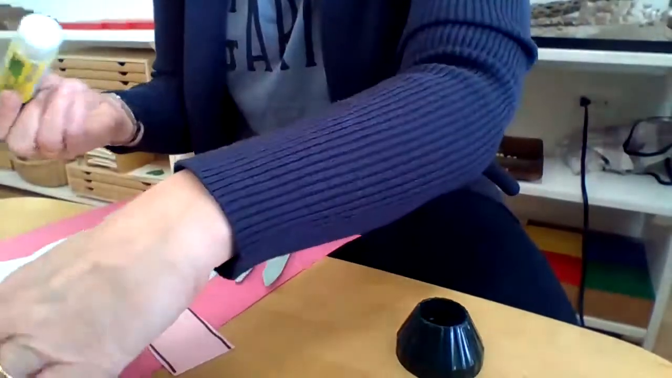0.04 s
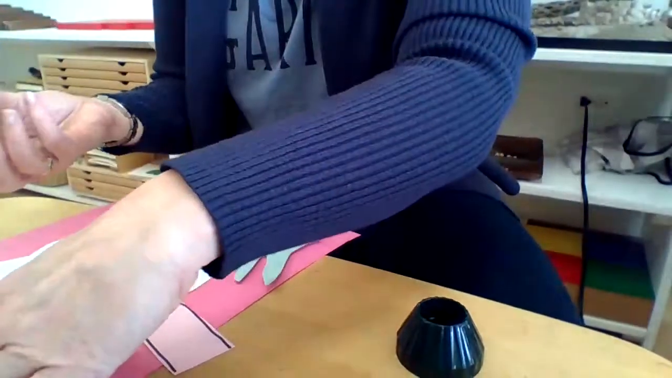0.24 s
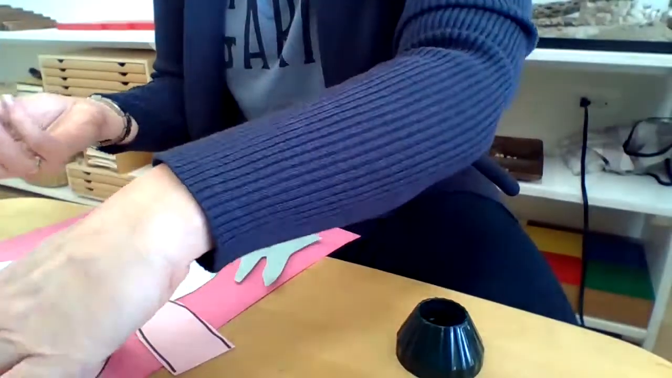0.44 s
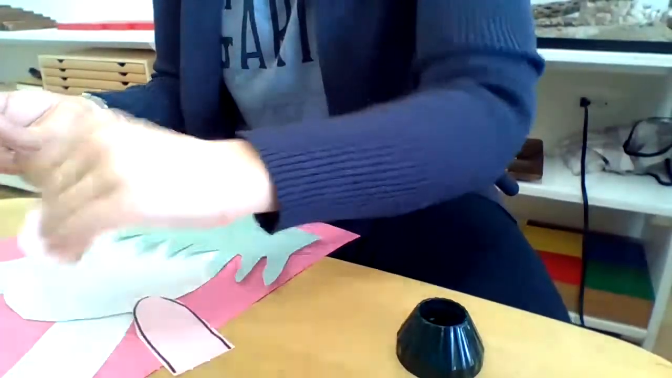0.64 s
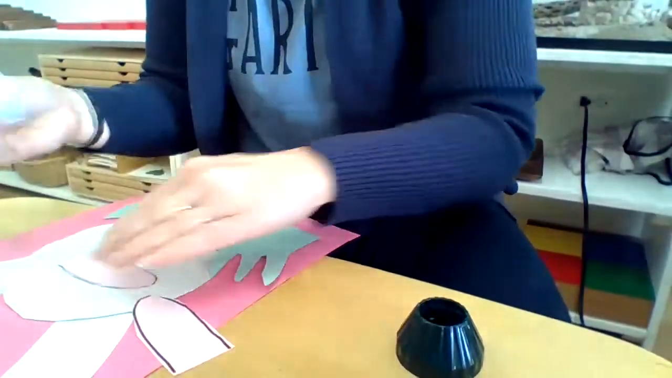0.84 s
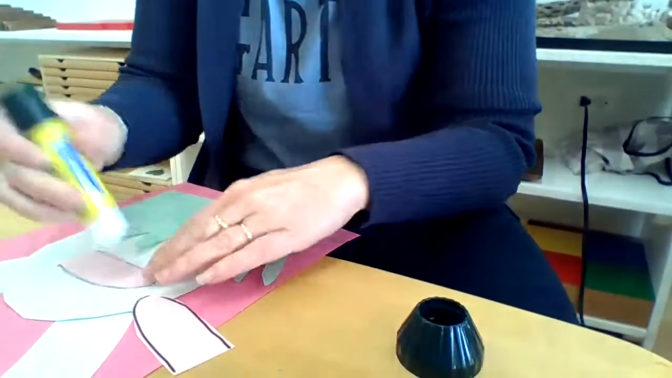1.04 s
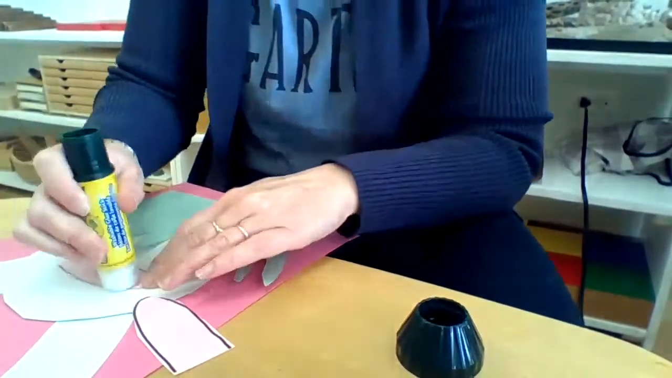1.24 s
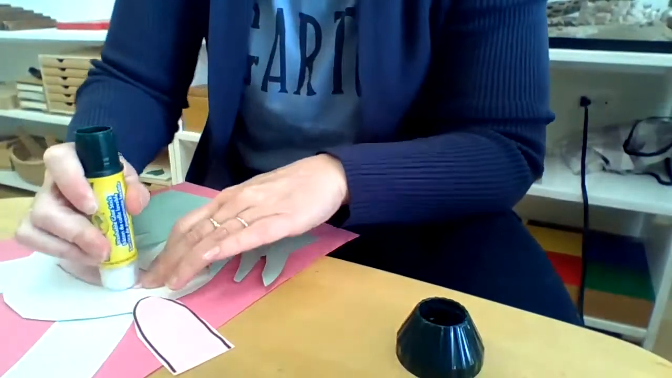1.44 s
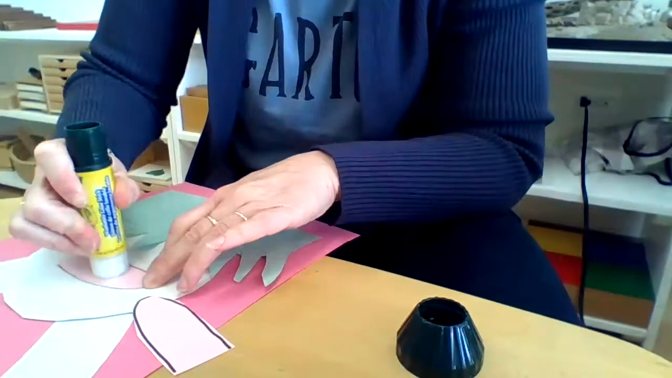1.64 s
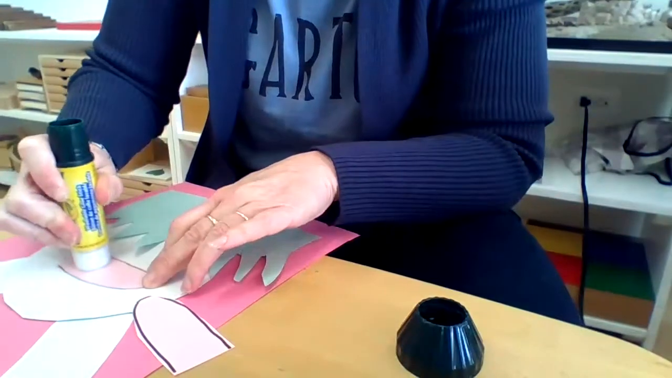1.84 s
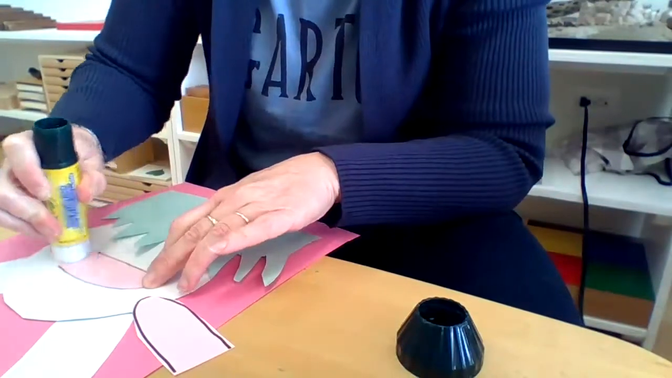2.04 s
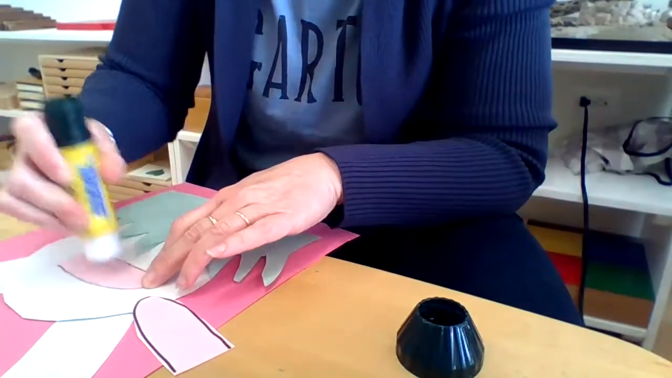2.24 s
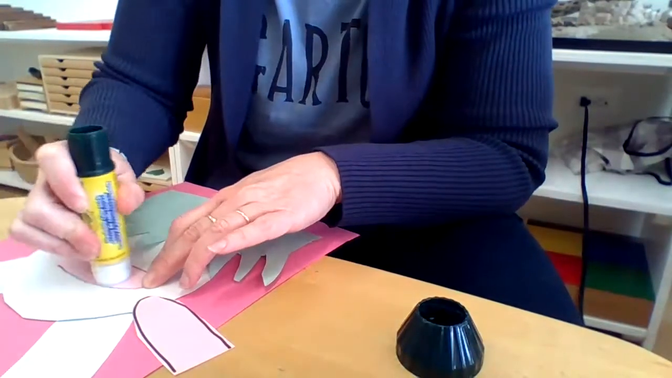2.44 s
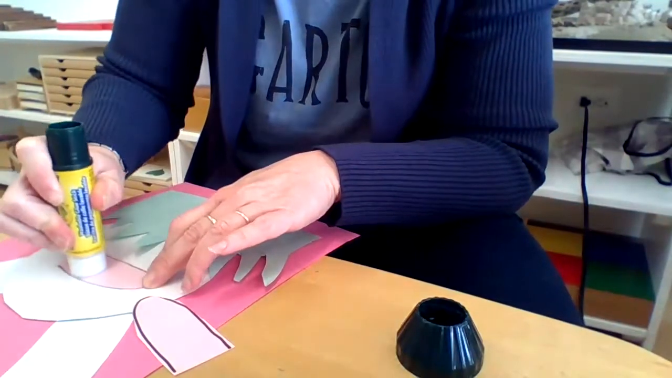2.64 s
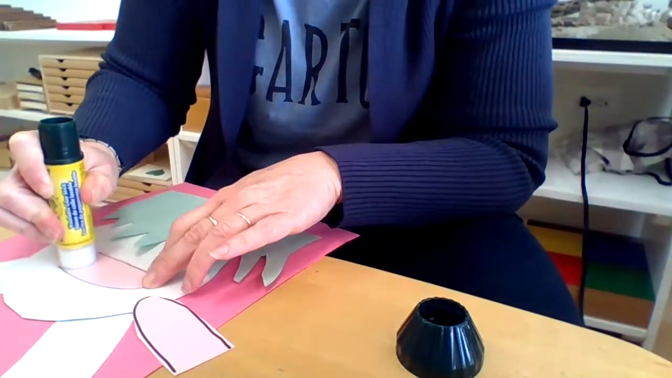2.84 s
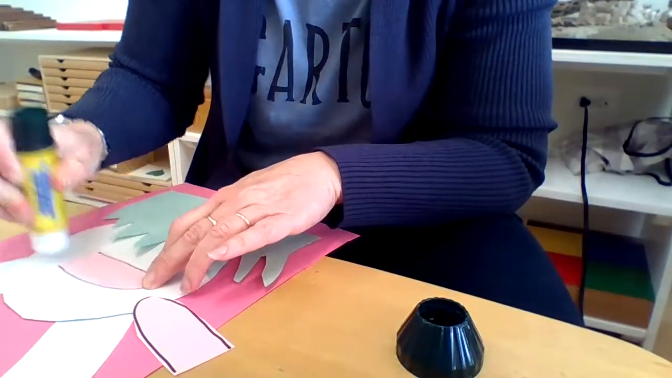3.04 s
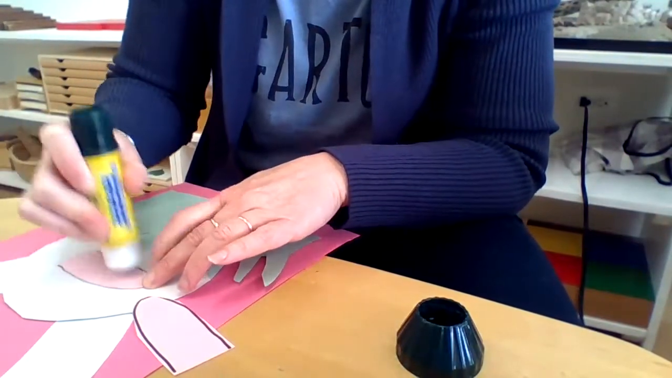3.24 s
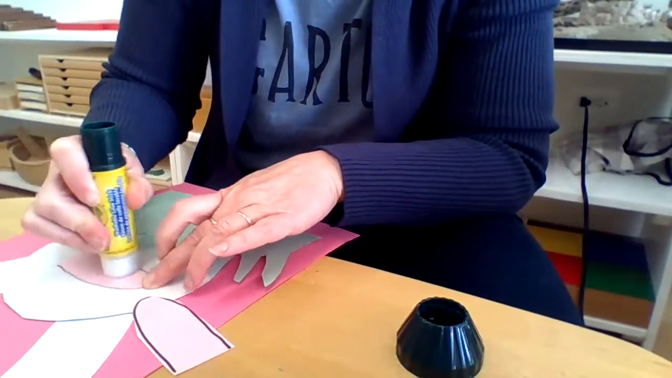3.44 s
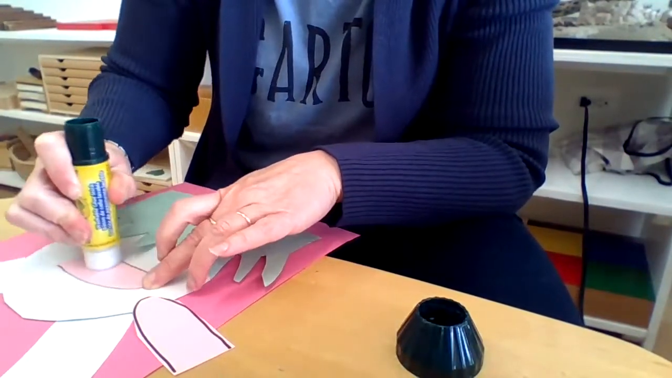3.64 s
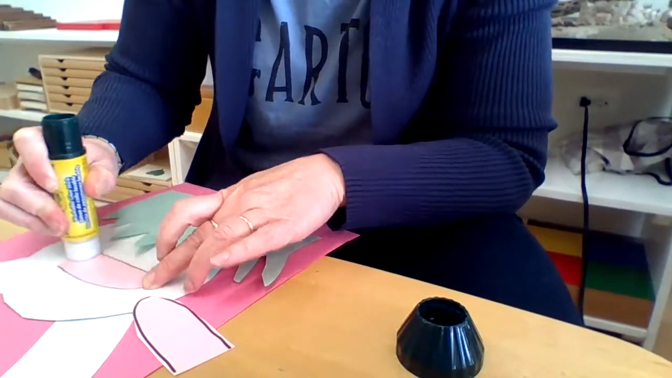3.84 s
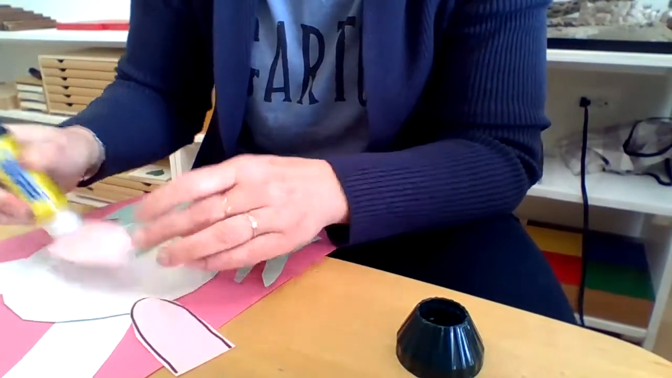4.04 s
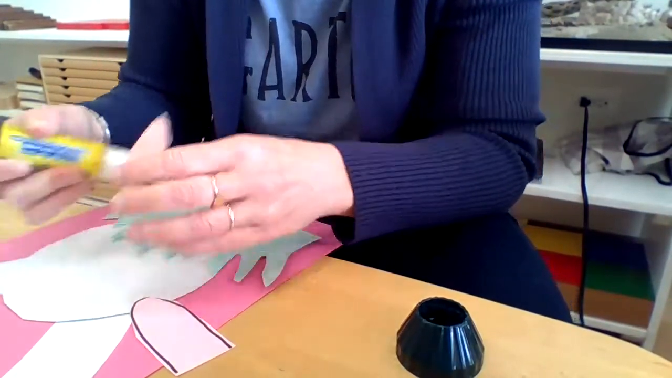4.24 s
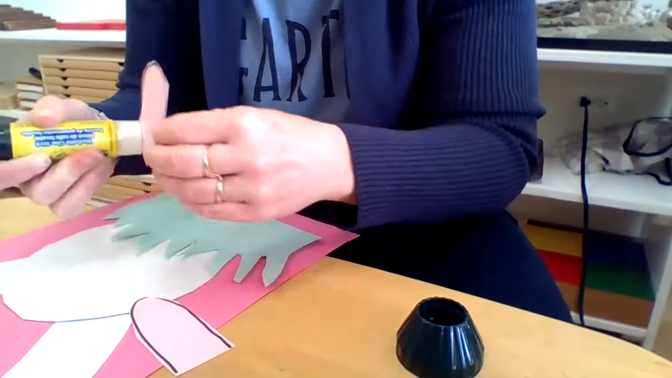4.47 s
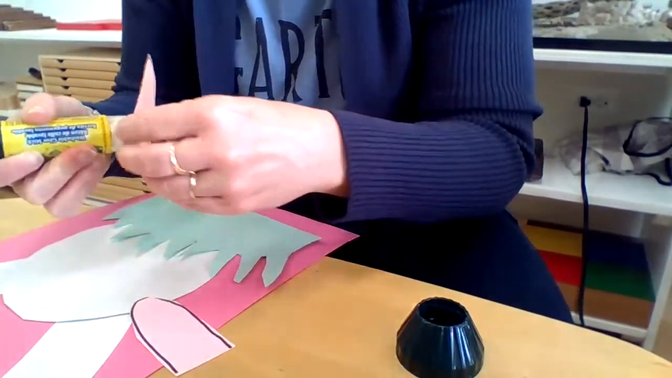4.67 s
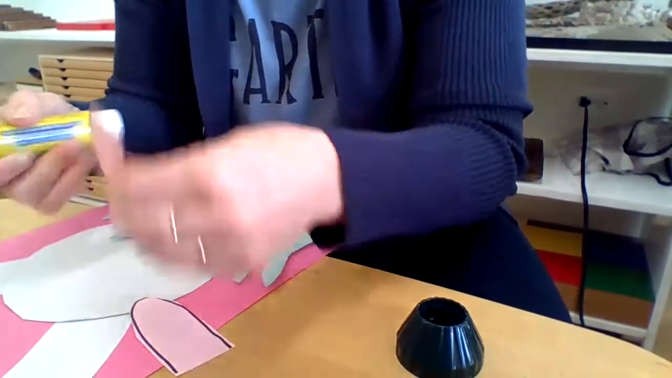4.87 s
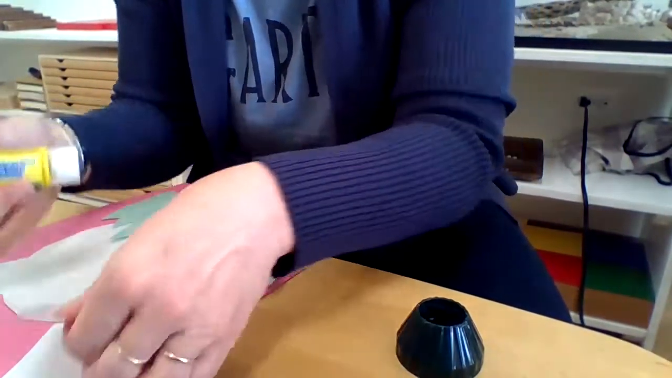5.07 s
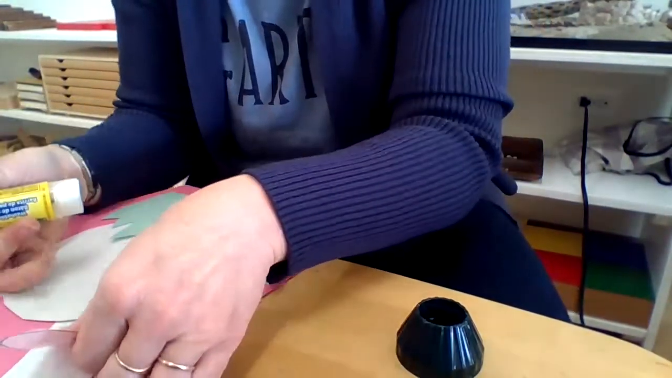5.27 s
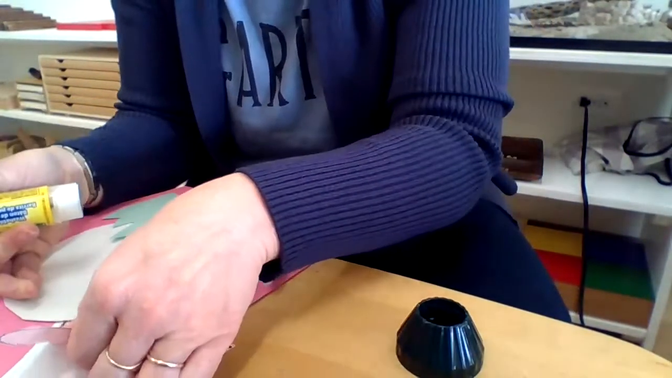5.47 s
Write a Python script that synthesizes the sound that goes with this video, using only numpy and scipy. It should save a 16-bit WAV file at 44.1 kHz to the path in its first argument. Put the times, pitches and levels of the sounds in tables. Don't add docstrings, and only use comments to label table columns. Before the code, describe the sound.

Three hard woody knocks of a glue stick on a paper-covered table, between faint papery rustles, a sticky snap and a last dull bump in a quiet room.

```python
import sys
import numpy as np
from scipy import signal
from scipy.fft import rfft, irfft, next_fast_len
from scipy.io import wavfile
from scipy.ndimage import uniform_filter1d

SR = 44100
rng = np.random.default_rng(int(sys.argv[2]) if len(sys.argv) > 2 else 0)


def volts_from_decibels(level):
    exponent = np.asarray(level, float) / 20
    return 10 ** exponent


def output_pcm(signal):
    pcm = np.clip(np.atleast_2d(signal).T, -1, 1) * 32767
    wavfile.write(sys.argv[1], SR, np.round(pcm).astype(np.int16))


N = 242991

# (first touch [s], rim crack [s], full force [s])
CONTACTS = [
    (1.3110, 1.3137, 1.3156),
    (2.4498, 2.4519, 2.45245),
    (3.4006, 3.4027, 3.4032),
]
# (touch [dB], crack [dB], blow [dB], contact [ms], room [dB])
KNOCKS = [
    (-20.5, -20, 0.5, 0.65, -44),
    (-25, -19, 0.8, 0.54, -43),
    (-23, -19, 0.4, 0.36, -40.5),
]


def evened(x):
    return x / np.sqrt(np.mean(x ** 2) + 1e-20)


def smooth_noise(width, passes=1):
    x = rng.standard_normal(N)
    for _ in range(passes):
        x = uniform_filter1d(x, size=width)
    return evened(x)


def read(points, hz):
    f, value = np.transpose(points)
    return np.interp(np.log(hz + 1), np.log(f + 1), value)


def add(mix, start_s, sound):
    part = mix[round(start_s * SR):][:len(sound)]
    part += sound[:len(part)]


def coloured(points, x):
    size = next_fast_len(len(x))
    gain = volts_from_decibels(read(points, np.fft.rfftfreq(size, 1 / SR)))
    return irfft(rfft(x, size) * gain, size)[:len(x)]


def click(points):
    log_gain = np.log(volts_from_decibels(read(points, abs(np.fft.fftfreq(2048, 1 / SR)))))
    pulse = np.fft.ifft(np.exp(np.conj(signal.hilbert(log_gain)))).real[:1024]
    return pulse / abs(pulse).max()


def ring(hz, t60_s, db=0, count=SR // 2):
    t = np.arange(count) / SR
    return volts_from_decibels(db - 60 * t / max(t60_s, .001)) * np.cos(2 * np.pi * hz * t)


def push(contact_ms):
    length = contact_ms * SR / 1000
    force = np.sin(np.pi * np.arange(.5, length) / length)
    return force / force.sum()


def table_top(place):
    # (frequency [Hz], t60 [s], sign, level at first, second, third place [dB])
    modes = [(146, .15, 1, -24.5, -22.5, -23), (209.9, .245, 1, -20, -18.5, -18.5),
             (262.3, .3, -1, -33, -33, -31.5), (289.8, .33, 1, -26.5, -25.5, -26.5),
             (324.8, .25, 1, -16.5, -17.5, -17), (373.5, .062, 1, -20.5, -18.5, -22),
             (420.5, .098, 1, -10.5, -10, -10.5), (449.2, .031, -1, -11, -8, -8),
             (511.9, .108, -1, -33, -30, -30.5), (565, .053, -1, -29.5, -18.5, -19),
             (642, .12, -1, -45, -24, -23.5), (690.5, .068, 1, -14.5, -7.5, -6.5),
             (715.2, .051, -1, -21, -24, -19.5), (860, .06, -1, -33, -32.5, -26.5),
             (940, .037, -1, -34, -27, -22.5)]
    return sum(sign * ring(hz, t60_s, db[place]) for hz, t60_s, sign, *db in modes)


def knocks():
    # (frequency [Hz], level [dB])
    crack_spectrum = [(500, -11.5), (1300, 2.5), (2350, -12), (2700, -24.5), (3200, -11.5), (4000, -24.5),
                      (5200, -10), (6800, -16.5), (9200, -20), (12500, -14), (14500, -13.5), (15800, -23.5),
                      (20000, -28)]
    # (frequency [Hz], t60 [s], level in first, second, third blow [dB])
    rim_modes = [(835, .035, -19, -39, -36), (1080, .06, -34.5, -39.5, -33), (1390, 0.023, -45, -29, -31.5),
                 (1290, 0.044, -37, -25.5, -29), (1530, 0.034, -27, -25.5, -26.5),
                 (1730, .02, -47.5, -32.5, -33.5), (1820, .03, -62, -35.5, -40),
                 (1950, .012, -55, -28, -33.5), (2150, 0.016, -36, -26, -21.5), (2390, .014, -49, -34, -38),
                 (2710, 0.014, -29.5, -56, -52.5), (2940, 0.019, -32.5, -42.5, -40),
                 (3270, .012, -49, -40.5, -44)]
    # (delay [s], level [dB])
    bounces = [(.004, -21), (.0068, -17), (.0095, -23), (.0128, -20), (.016, -23), (.0195, -26),
               (.023, -25), (.03, -30)]
    touch_tick_db, grind_db = -12, -15.5
    pulse = click(crack_spectrum)
    out = np.zeros(N)
    for place, (times_s, knock) in enumerate(zip(CONTACTS, KNOCKS)):
        touch_s, crack_s, force_s = times_s
        touch_db, crack_db, blow_db, contact_ms, _ = knock
        add(out, touch_s - .0003, -np.convolve(ring(770, .032, touch_db), push(.52)))
        blow = np.convolve(table_top(place), push(contact_ms))
        add(out, force_s - contact_ms / 2000, blow * volts_from_decibels(blow_db))

        rattle = ring(0, .012, -22, count=600) * rng.standard_normal(600)
        rattle[0] = -1
        crack = volts_from_decibels(crack_db) * np.convolve(rattle, pulse)
        add(out, crack_s, crack)
        add(out, touch_s, volts_from_decibels(touch_tick_db) * crack)

        squeeze = np.linspace(.15, 1, round((crack_s - touch_s) * SR)) ** 2
        squeeze = squeeze * rng.standard_normal(len(squeeze))
        grind = np.convolve(squeeze, np.convolve(pulse, push(.09)))
        add(out, touch_s, volts_from_decibels(crack_db + grind_db) * grind)

        treble = np.convolve(crack, [.4, .4, 0, -.4, -.4])
        for delay_s, bounce_db in bounces:
            smear = rng.standard_normal(30) / 6
            add(out, crack_s + delay_s, volts_from_decibels(bounce_db) * np.convolve(treble, smear))

        rim = sum(ring(hz, t60_s, db[place]) for hz, t60_s, *db in rim_modes)
        add(out, crack_s, -np.convolve(rim, push(.22)))
    return out


def bumps():
    # (time [s], blow [dB], contact [ms])
    hits = [
        (1.4445, -36, 0.72),
        (2.101, -47, .4),
        (2.133, -37.5, 0.25),
        (3.059, -40.5, 0.74),
        (3.777, -39.5, 0.2),
        (3.856, -40, 0.75),
        (4.058, -44, 1.9),
        (4.076, -29, 2.46),
        (5.288, -20, 2.52),
    ]
    out = np.zeros(N)
    for start_s, db, contact_ms in hits:
        add(out, start_s, np.convolve(table_top(2), push(contact_ms)) * volts_from_decibels(db))
    return out


def snaps():
    # (time [s], level [dB], level added at the top of the range [dB])
    releases = [
        (4.0553, -14.5, 0),
        (4.1022, -34, -7),
    ]
    # (frequency [Hz], level [dB])
    spectrum = [(180, -12), (300, 6.5), (987, -1.5), (2360, 6.5), (3410, 0), (4690, 9), (5550, 3),
                (7260, -10), (12800, 2), (16300, -2), (20000, -9)]
    out = np.zeros(N)
    for start_s, db, top_db in releases:
        shiver = ring(0, .011, -23, count=800) * rng.standard_normal(800)
        shiver[0] = 1
        snap = np.convolve(shiver, click(spectrum))
        add(out, start_s, volts_from_decibels(db) * coloured([(5000, 0), (12000, top_db)], snap))
    return out


def slips(per_s, spread_db, flutter_db):
    clumps = smooth_noise(300)
    size = volts_from_decibels(spread_db * np.minimum(rng.exponential(1, N), 4) + flutter_db * clumps)
    return evened(size * rng.standard_normal(N) * (rng.random(N) < per_s / SR))


def stroke(rows, column, rise_s, fade_db_per_s, rest_db, sag_db=0, arch=0):
    power = np.full(N, volts_from_decibels(rest_db) ** 2)
    t = np.arange(SR // 2) / SR
    for row in rows:
        start_s, hold_s = row[:2]
        done = np.clip(t / (rise_s + hold_s), 0, 1)
        swell = (.2 + .8 * np.sin(np.pi * done)) ** arch
        fade_db = fade_db_per_s * np.maximum(t - rise_s - hold_s, 0)
        gain = volts_from_decibels(row[column] + sag_db * done + fade_db)
        add(power, max(start_s - rise_s / 2, 0), (np.minimum(t / rise_s, 1) * swell * gain) ** 2)
    return np.sqrt(power)


def patchy(x, patchy_db):
    z = signal.stft(x, nperseg=256)[2]
    field = uniform_filter1d(rng.standard_normal(z.shape), size=7, axis=0)
    field = uniform_filter1d(field, size=7, axis=1)
    return evened(signal.istft(z * volts_from_decibels(patchy_db * evened(field)), nperseg=256)[1][:N])


def scraped_tube(down):
    # (frequency [Hz], width [Hz], level [dB])
    modes = [(1410, 320, 3), (1535, 320, -11), (2010, 340, 2), (2191, 270, -1.5)]
    # (stick lifted [dB], pressed on the sheet [dB])
    upper_db = (-3.5, -2)
    scrape = slips(per_s=9000, spread_db=1.5, flutter_db=1.3)
    rung = []
    for hz, width_hz, db in modes:
        mode = ring(hz, 2 / width_hz, count=600)
        twice = np.convolve(mode, mode)
        rung.append(volts_from_decibels(db) * evened(signal.oaconvolve(scrape, twice)[:N]))
    upper = volts_from_decibels(np.where(down, upper_db[1], upper_db[0]))
    return evened(sum(rung[:2]) + upper * sum(rung[2:]))


def rubbing():
    # (start [s], hold [s], flat of the hand [dB], tip of stick or finger [dB])
    presses = [(0.0, 0.04, -60.5, -62), (0.165, 0.013, -72, -47), (0.175, 0.028, -63, -43.5),
               (0.185, 0.078, -43, -52.5), (0.28, 0.1, -55, -57), (0.44, 0.036, -74, -62),
               (0.522, 0.0067, -47.5, -51.5), (0.55, 0.031, -51.5, -65), (0.605, 0.02, -73, -55),
               (0.825, 0.01, -70.5, -50), (1.44, 0.049, -44, -52), (1.565, 0.088, -54, -55.5),
               (1.738, 0.0074, -50, -45.5), (1.78, 0.1, -58, -51.5), (2.1, 0.015, -66.5, -62.5),
               (2.14, 0.037, -48.5, -61.5), (2.28, 0.1, -70, -75.5), (2.6, 0.074, -60, -61),
               (3.06, .04, -59, -67), (3.17, 0.056, -59.5, -84), (3.3, 0.089, -63, -75),
               (3.56, 0.14, -56, -77), (3.76, 0.1, -58.5, -72), (4.0, .1, -63, -59.5),
               (4.49, 0.13, -90, -69.5), (4.76, 0.035, -68, -59.5), (4.885, 0.015, -64.5, -53.5),
               (5.21, 0.11, -67.5, -63.5), (5.3, 0.048, -68, -76), (5.455, 0.013, -70, -69.5)]
    # (start [s], hold [s], tube scrape [dB], fibre hiss [dB])
    slides = [(0.0, 0.29, -69, -66), (0.16, 0.093, -52.5, -59.5), (.163, .025, -70, -59.5),
              (.22, 0.046, -70, -58.5), (.365, 0.016, -77, -64.5), (0.29, 0.21, -70.5, -66.5),
              (0.435, 0.036, -73, -56.5), (0.53, 0.071, -60, -62), (0.567, 0.021, -58, -45.5),
              (0.605, 0.043, -60.5, -50), (0.66, 0.045, -67, -66), (0.69, 0.14, -68.5, -65),
              (0.83, 0.0081, -66, -58), (.85, 0.033, -78, -62.5), (.882, 0.0072, -79, -61),
              (.9, .04, -84, -72), (1.0, 0.019, -70, -68), (1.44, 0.024, -69, -76),
              (1.54, 0.12, -68.5, -73), (1.74, 0.022, -64, -66), (1.76, 0.12, -53, -65),
              (1.86, 0.07, -58.5, -70), (2.128, 0.038, -65.5, -69), (3.27, 0.017, -84.5, -80),
              (4.06, 0.026, -70, -71), (4.104, 0.0067, -55, -63), (4.12, .06, -80, -77),
              (4.44, 0.11, -73.5, -72), (4.545, 0.051, -67, -62), (4.77, 0.017, -71, -69),
              (4.886, 0.0048, -62, -48), (5.21, 0.089, -66.5, -59.5), (5.235, .03, -75, -71),
              (5.29, 0.039, -65.5, -66), (5.325, 0.079, -65, -58), (5.39, 0.086, -75, -67.5)]
    # flat, tip, tube, fibres [dB]
    rest_db = [-87.5, -86, -82.5, -90]
    # (from [s], to [s])
    stick_down_s = (1.3, 4.11)
    # (frequency [Hz], level [dB])
    palm = [(60, -16.5), (130, 0), (210, -4.5), (300, -9.5), (450, -21.5)]
    # (frequency [Hz], level [dB])
    tip_contact = [(200, -22.5), (330, -3), (430, -0.5), (530, -5.5), (690, 1), (900, 9.5), (1050, 6.5),
                   (1200, -13.5)]
    # (frequency [Hz], level [dB])
    fingertip = [(250, 4), (450, 9), (700, 1), (1000, -1), (1300, -23), (1800, -30)]
    # (frequency [Hz], density [dB per Hz])
    fibres = [(1470, -26.5), (2500, -3.5), (3300, -4), (6250, -4.5), (7030, -4.5), (11100, -6), (15100, -9),
              (16100, -8.5), (16500, -30)]
    t = np.arange(N) / SR
    down = (t > stick_down_s[0]) & (t < stick_down_s[1])
    flat, tip = (stroke(presses, 2 + k, rise_s=.004, fade_db_per_s=-500, rest_db=rest_db[k], sag_db=-4)
                 for k in range(2))
    scraping, hissing = (stroke(slides, 2 + k, rise_s=.0064, fade_db_per_s=-700, rest_db=rest_db[2 + k], arch=.44)
                         for k in range(2))

    dragged = np.zeros(N)
    lead = 400
    for weight, contact in ((flat, palm), (tip * down, tip_contact)):
        wood = coloured(contact, np.roll(table_top(0) + table_top(1), lead))
        drag = weight * slips(per_s=8000, spread_db=1.2, flutter_db=.8)
        dragged += signal.oaconvolve(drag, wood / np.linalg.norm(wood))[lead:N + lead]

    tube = scraped_tube(down)
    hiss = patchy(coloured(fibres, slips(per_s=20000, spread_db=2, flutter_db=1.2)), patchy_db=2.2)
    finger = evened(coloured(fingertip, slips(per_s=4500, spread_db=3.5, flutter_db=-2)))
    uneven_speed = volts_from_decibels(1.0 * smooth_noise(500, passes=2))
    return dragged + uneven_speed * (tip * ~down * finger + scraping * tube + hissing * hiss)


def ticks():
    # (time [s], level [dB], centre [Hz], t60 [s], ring
    paper = [(0.054, -39.5, 1880, 0.012, 5), (0.4177, -37.5, 8100, 0.007, 6),
             (0.4327, -45.5, 1460, 0.021, 6.1), (0.4609, -27.5, 2650, 0.0066, 9),
             (0.5242, -38, 2500, 0.006, 2.8), (0.656, -35, 1170, 0.018, 5.1),
             (0.6616, -35, 950, 0.052, 9.5), (0.826, -31, 11200, 0.0092, 5), (0.865, -44.5, 1410, 0.05, 10),
             (0.9938, -36.5, 1290, 0.012, 2.5), (1.167, -50, 1500, 0.016, 10), (1.166, -40, 714, .02, 11),
             (1.2096, -56, 1430, 0.014, 3.5), (1.741, -49, 2010, 0.0069, 5.8),
             (3.0592, -41.5, 1945, 0.0097, 19), (4.776, -42, 1040, 0.01, 2.7),
             (4.8913, -42, 917, 0.0036, 3.6), (4.9193, -43, 864, 0.01, 3), (5.2092, -49, 909, 0.078, 11),
             (5.461, -46, 450, 0.03, 12), (2.321, -62, 1160, 0.26, 18), (1.915, -43, 900, 0.041, 7.3),
             (1.445, -43.5, 2500, .012, 6.7), (1.4707, -45, 2000, .008, 3), (1.535, -48, 3700, .008, 5),
             (1.6029, -51, 2200, .012, 6), (1.6178, -46, 2100, .01, 4), (.2204, -45, 2230, .01, 3),
             (.739, -47, 3500, .006, 2), (.884, -44, 8500, .012, 14), (4.1028, -34, 3200, 0.014, 2.5),
             (4.074, -50, 7800, .006, 6), (4.188, -56, 8200, .02, 20), (2.1302, -50, 1450, 0.023, 8.8),
             (5.2178, -49, 4500, .008, 3), (.35, -46, 11000, .01, 6),
             (.569, -42, 2100, .03, 6), (.573, -43, 6300, .02, 14), (.6193, -44, 6000, .015, 8),
              (.826, -38, 4500, .008, 2.5), (.4185, -47, 13000, .008, 4), (.481, -50, 9500, .008, 8),
              (2.448, -47, 6000, .005, 4), (3.396, -43, 6000, .005, 2.1), (3.462, -53, 10000, .005, 2.1),
              (4.04, -50, 12000, .005, 2), (4.0515, -46, 5500, .012, 4), (.8695, -41, 4500, .007, 2),
              (.896, -51, 4000, .006, 1.5), (4.0617, -42, 12000, .004, 3.1), (.994, -50, 5200, .006, 3),
              (1.2115, -50, 6000, .008, 1.2), (1.228, -53, 10000, .006, 1.5), (4.887, -51, 6000, .012, 1.5),
              (4.188, -49, 13900, .04, 160), (4.3635, -52, 14300, .025, 40), (4.364, -57, 8000, .02, 30),
              (4.548, -52, 1430, .05, 12), (4.558, -53, 3100, .06, 30), (5.255, -52, 1540, .07, 25),
              (5.272, -52, 1070, .07, 20), (5.35, -54, 910, .08, 20)]
    count = 3000
    out = np.zeros(N)
    for start_s, db, hz, t60_s, cycles in paper:
        noise = rng.standard_normal(count)
        noise[0] = 5
        body = np.convolve(noise, ring(hz, cycles / hz, count=400))[:count]
        edge_db = 4.5 - 6.5 * np.log2(cycles)
        edge = volts_from_decibels(edge_db) * np.diff(noise, prepend=0)
        tick = ring(0, t60_s, count=count) * (evened(body) + edge)
        add(out, start_s, volts_from_decibels(db) * tick / abs(tick).max())
    return out


def gliding(rows, q):
    out = np.zeros(N)
    for start_s, length_s, db, from_hz, to_hz in rows:
        noise = rng.standard_normal((2, SR // 4))
        done = np.arange(0, 1, 1 / (length_s * SR))[:SR // 4]
        pole = np.exp(-np.pi * from_hz / q / SR)
        slow = signal.lfilter([1], np.convolve([1, -pole], [1, -pole]), noise[0] + 1j * noise[1])
        turns = np.cumsum(from_hz + (to_hz - from_hz) * done) / SR
        band = (slow[:len(done)] * np.exp(2j * np.pi * turns)).real
        add(out, start_s, volts_from_decibels(db) * np.sqrt(np.sin(np.pi * done)) * evened(band))
    return out


def singing():
    # (start [s], length [s], level [dB], from [Hz], to [Hz])
    sings = [(.09, .054, -70, 4700, 5330), (.165, .083, -55, 1426, 1316), (.17, .03, -64, 4600, 4700),
             (.21, .037, -68, 4870, 4900), (.22, .04, -64, 10500, 10500), (.222, .03, -65, 14800, 14800),
             (.432, .018, -59, 1520, 1500), (.565, .019, -54, 6500, 6160), (.57, .016, -51, 2314, 1820),
             (.575, .035, -58, 5800, 5720), (.61, .04, -58, 11000, 11500), (.625, .024, -51, 6660, 5550),
             (.632, .025, -58, 15200, 15000), (.656, .0167, -56, 1700, 1500), (.67, .03, -64, 14200, 14600),
             (.76, .035, -68, 11500, 12500), (.828, .016, -60, 12300, 12000), (1.76, .062, -55, 2000, 2400),
             (1.76, .19, -70, 7620, 7600), (1.774, .14, -74, 9400, 9400), (1.78, .1, -70, 3920, 3380),
             (1.78, .15, -71, 11500, 11500), (1.8, .14, -66, 5060, 4680), (1.83, .094, -58.5, 2250, 2010),
             (4.062, .03, -65, 4650, 4300), (4.104, .02, -62, 2600, 2200), (4.106, .07, -70, 3900, 4600),
             (5.21, .08, -68, 4180, 4370), (5.235, .036, -63, 6860, 6500), (5.235, .04, -65, 14000, 14500),
             (5.238, .03, -70, 3520, 3470), (5.34, .08, -68, 4540, 3900), (5.345, .04, -64, 6100, 6500),
             (5.44, .04, -73, 6300, 6600)]
    return gliding(sings, q=5.8)


def humming():
    # (start [s], length [s], level [dB], from [Hz], to [Hz])
    hums = [(1.446, .045, -53, 700, 690), (1.565, .09, -56, 690, 690), (1.785, .11, -54, 700, 680),
            (2.098, .04, -57, 690, 685), (2.127, .06, -52, 695, 700), (2.13, .07, -54, 210, 210),
            (2.14, .045, -62, 850, 950), (2.145, .05, -60, 425, 430), (2.235, .04, -66, 510, 520),
            (3.295, .035, -62, 680, 680)]
    return gliding(hums, q=14)


def blows_to_room():
    # (frequency [Hz], level [dB])
    wash = [(150, -2.5), (450, 4.5), (900, -1.5), (1500, -8.5), (2200, -18), (3100, -20.5), (4500, -25),
            (7000, -22.5), (11000, -22.5), (16000, -26.5)]
    # (frequency [Hz], t60 [s], level [dB])
    linger = [(685, .12, -44), (1070, .08, -56.5), (1240, .08, -53.5), (1596, .07, -56.5),
              (2250, 0.034, -53)]
    out = np.zeros(N)
    for (_, crack_s, _), knock in zip(CONTACTS, KNOCKS):
        out[round(crack_s * SR)] = volts_from_decibels(knock[-1] + 40)
    lasting = sum(ring(*mode) for mode in linger)
    return coloured(wash, out) + signal.oaconvolve(out, lasting)[:N]


def room(x):
    # (frequency [Hz], t60 [s])
    decay = [(150, .5), (600, .6), (1200, .62), (2500, .55), (4000, .36), (7000, .17), (12000, .12)]
    taps = np.zeros(SR)
    at = np.arange(200, SR - 20, 20)
    taps[at + rng.integers(0, 20, len(at))] = rng.choice([-1., 1.], len(at))
    hz, t, z = signal.stft(taps, SR, nperseg=128)
    fade = volts_from_decibels(-60 * t / read(decay, hz)[:, None])
    tail = signal.istft(z * fade, SR, nperseg=128)[1]
    return signal.fftconvolve(x, tail / np.linalg.norm(tail))[:N]


def air():
    # (frequency [Hz], density [dB per Hz])
    spectrum = [(8.8, -37.5), (15, 12.5), (37, 0), (143, -9.5), (584, -24), (1080, -31), (2530, -34.5),
                (2840, -30), (3110, -34), (6270, -35.5), (8170, -35.5), (9180, -35.5), (15100, -32),
                (16400, -32)]
    # (frequency [Hz], level [dB rms])
    whines = [(2905, -78), (5809, -86.5), (8000, -84.5), (13096, -86)]
    t = np.arange(N) / SR
    waver = volts_from_decibels(.59 * smooth_noise(1500))
    whine = sum(np.sqrt(2) * volts_from_decibels(db) * np.sin(2 * np.pi * hz * t) for hz, db in whines)
    return volts_from_decibels(-53.5) * evened(coloured(spectrum, rng.standard_normal(N))) + waver * whine


def scene():
    # (frequency [Hz], level [dB])
    low_cut = [(50, -12), (110, -7), (145, -1), (170, 0)]
    # (frequency [Hz], level [dB])
    echo = [(150, -22), (600, -17), (1500, -19.5), (4000, -18), (12000, -17.5)]
    # (frequency [Hz], level [dB])
    loud_edge = [(16150, 0), (16450, -14), (16780, -34), (16830, -80)]
    # (frequency [Hz], level [dB])
    quiet_edge = [(15950, 0), (16030, -50)]
    struck = coloured(low_cut, knocks() + bumps())
    snap = snaps()
    handling = rubbing() + ticks() + singing() + humming()
    reflected = room(blows_to_room() + coloured(echo, snap + handling))
    loud = coloured(loud_edge, struck + snap)
    quiet = coloured(quiet_edge, handling + reflected + air())
    return (loud + quiet)[None]


def band_limit(x):
    return signal.sosfilt(signal.butter(12, 16810, fs=SR, output="sos"), x)


def record(dry):
    ceiling = .7
    mix = dry / (1 + (abs(dry) / ceiling) ** 6) ** (1 / 6)
    return band_limit(mix)


dry = scene()
out = record(dry)
output_pcm(out)
```